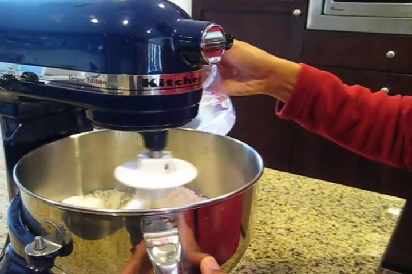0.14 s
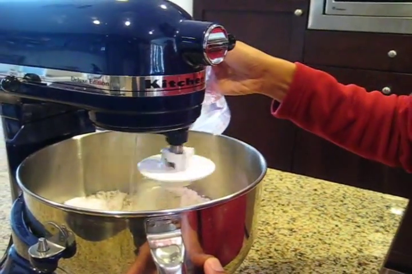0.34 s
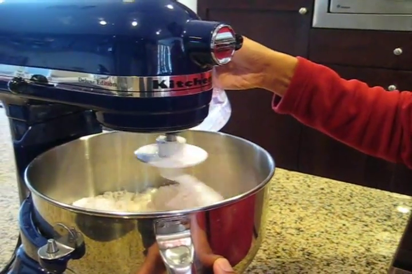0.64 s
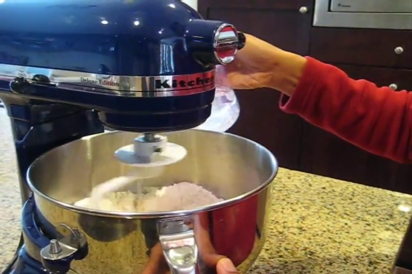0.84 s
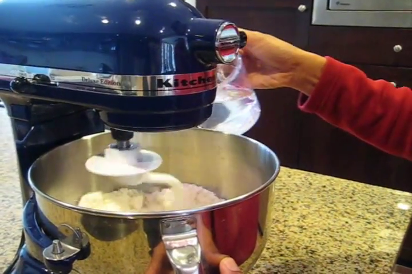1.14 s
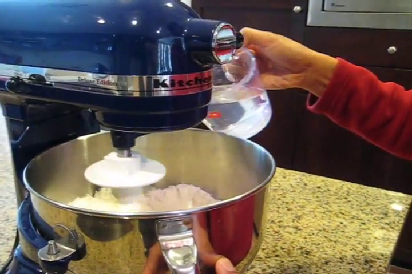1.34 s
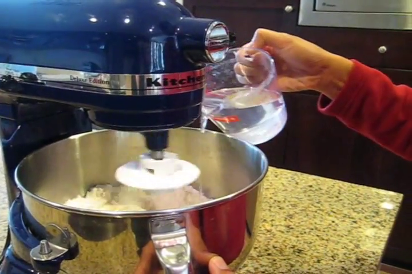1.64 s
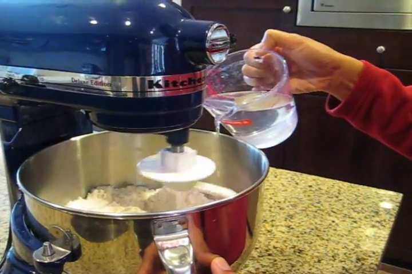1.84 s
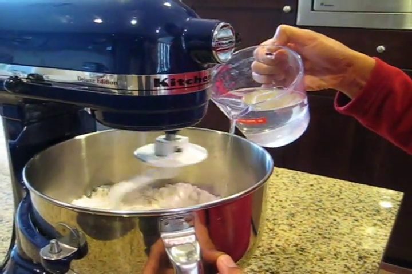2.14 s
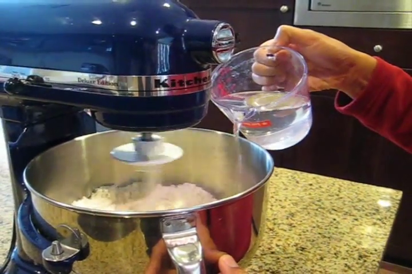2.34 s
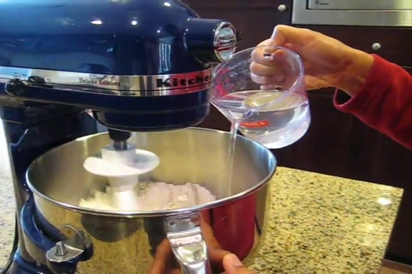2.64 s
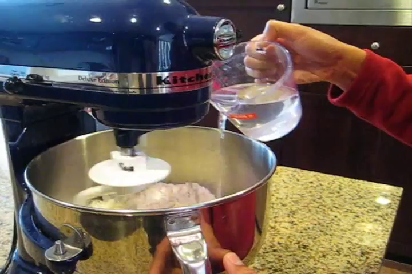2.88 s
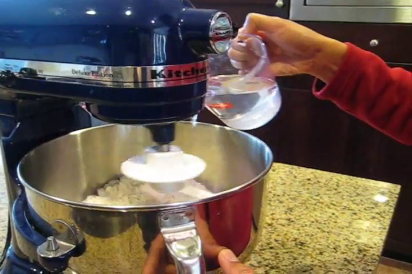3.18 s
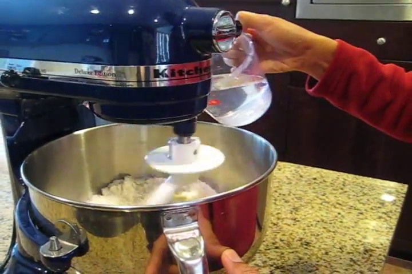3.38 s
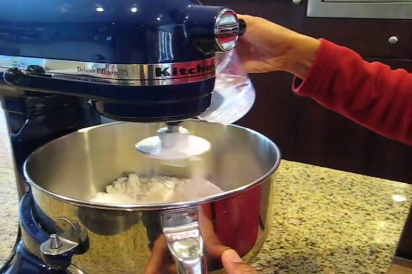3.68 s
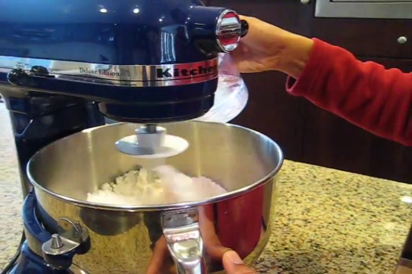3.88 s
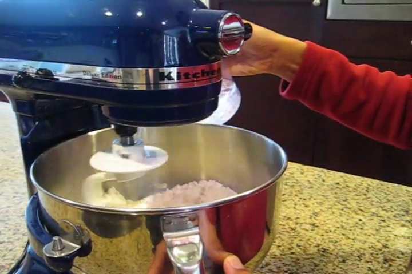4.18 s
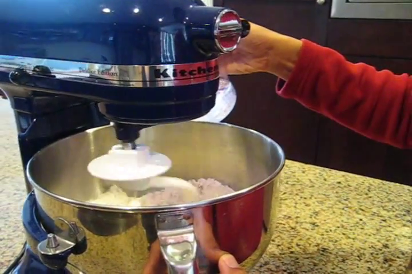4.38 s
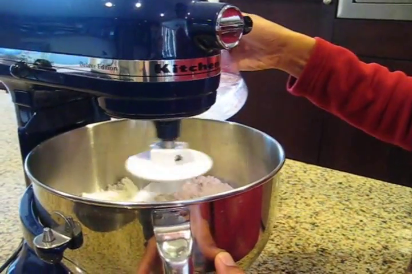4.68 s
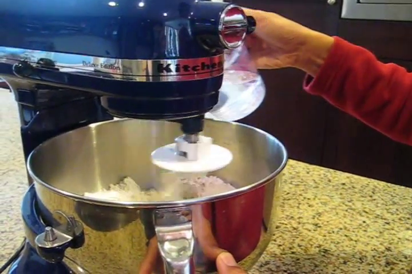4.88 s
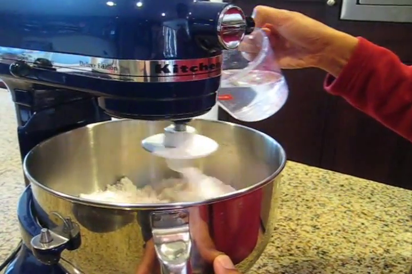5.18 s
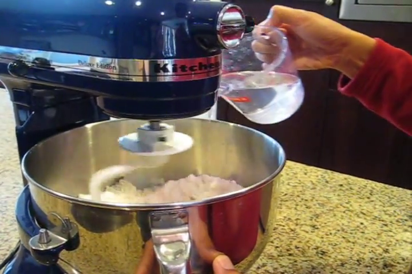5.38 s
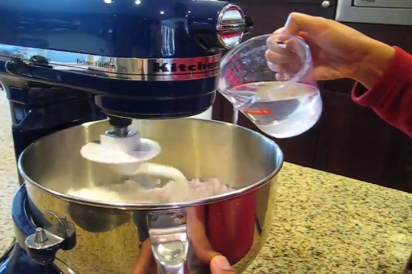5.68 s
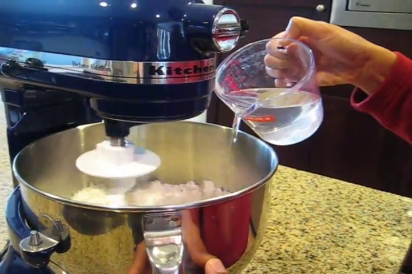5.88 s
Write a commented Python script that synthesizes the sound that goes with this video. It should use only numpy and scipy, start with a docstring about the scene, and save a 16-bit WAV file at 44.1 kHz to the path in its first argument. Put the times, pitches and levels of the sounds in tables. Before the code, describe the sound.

A stand mixer runs at low speed in a kitchen, close to the microphone. Its motor gives a bright, metallic rasp and hiss over a steady hum. Behind that, gears whine and chatter lightly above a faint rush of air. The sound pulses gently and the pitch sags a little as the dough hook turns, carrying on without a break from start to finish.

```python
"""A stand mixer's motor rasps and hums at low speed, close by in a kitchen, as its hook kneads flour.
Its brushes (sliding electrical contacts) scrape the spinning rotor and make the metal housing ring.
Magnets tug the rotor twice a turn, which makes the hum. Behind it, gears whine and chatter as the load
comes and goes, and a fan blows softly. The speed sags a little with each turn of the shaft and hook."""
import sys
import numpy as np
from scipy import signal
from scipy.fft import rfft, irfft, next_fast_len
from scipy.io import wavfile
from scipy.ndimage import map_coordinates

SR = 44100
rng = np.random.default_rng(int(sys.argv[2]) if len(sys.argv) > 2 else 0)


def dump_mix(stems):
    """Bounce the given channels to the path in sys.argv[1] as a 16-bit WAV at rate SR."""
    frames = np.atleast_2d(stems).T  # one column per channel
    limited = np.clip(frames, -1, 1)  # hard clip at full scale
    pcm = np.round(limited * 32767).astype(np.int16)
    wavfile.write(sys.argv[1], SR, pcm)


N = 265482

# Tone colour of the fan's air: f/Hz, relative level/dB
AIR_SPECTRUM = [(15, -31), (30, -31), (55, -20.5), (160, -17), (230, -4.5), (300, -3.5), (360, 5),
                (440, 6.5), (490, 4.5), (545, -6.5), (640, 2), (780, 7), (950, -2.5), (3000, -46)]
# Tone colour of the knocked gearbox: f/Hz, relative level/dB
GEARBOX_SPECTRUM = [(500, -23.5), (950, -12.5), (1100, 7.5), (1180, -1.5), (1270, 6), (1350, 5.5),
                    (1500, 9.5), (1650, -2.5), (1950, -9.5), (3000, -26)]
# Gear tones: cycles per turn of the gear wheel, level/dB, phase jitter/rad
WHINE_TONES = [(8.86, -48, .5), (11, -49, .4), (13, -50, .4), (18.4, -52, .5), (19, -52, .5), (21, -52, .5),
               (28.9, -46, .4), (33, -45.5, .4), (58.8, -40, .5), (71.9, -36.5, .5), (85, -41, .7),
               (107.8, -31.2, .55), (137.2, -34, .9)]
# Slow swell of the high gear tones, which ring the housing: t/s, level change/dB
HIGH_WHINE_SWELL = [(0, 0.5), (1.0, 0), (1.3, 1.5), (3.2, 1.5), (4.2, -0.5), (6.02, -2)]
# Slow loudness curve of the hum's lowest tone: t/s, level/dB
HUM_LEVEL = [(0, -26), (4.3, -25.5), (5.1, -24.5), (6.02, -24.8)]
# Brief swells and dips of the tone an octave above it: t/s, half width/s, level change/dB
HUM_OCTAVE_SWELLS = [(.1, .2, -2.5), (1.13, .13, 4), (1.33, .04, -4), (1.52, .06, -3), (3.31, .07, 3),
                     (3.53, .05, -4.5), (4.38, .06, 3), (5.75, .1, 3), (5.86, .025, -7)]
# Buzz of the motor's coils on mains power: f/Hz, level/dB
COIL_TONES = [(120, -70), (240, -47.5), (360, -44), (480, -58.5)]
# Slow swell of the brush noise: t/s, level change/dB
BRUSH_SWELL = [(0, -.1), (.4, 0), (.67, -0.5), (.92, 1), (1.3, -0.8), (1.53, 0.3), (1.7, -0.6), (2.15, 0),
               (2.6, -0.3), (3.0, -0.65), (4.1, -0.1), (4.6, 0.2), (6.02, -0.36)]
# Tone colour of the brushes' rasp: f/Hz, relative level/dB
RASP_SPECTRUM = [(900, -35), (1600, -7), (1950, -3), (2500, 0), (3100, -2), (3550, -2), (3950, 5),
                 (4400, 2.5), (5100, 4.5), (5800, 2), (6400, -1), (7500, -17), (10000, -40)]
# Tone colour of their higher hiss: f/Hz, relative level/dB
HISS_SPECTRUM = [(4000, -27.5), (6000, 0), (6900, 1.5), (7600, 2), (8000, -1.5), (9500, -2.5),
                 (10500, -1.5), (11000, 0.5), (11550, -0.5), (11900, -10.5), (12600, -7.5), (13600, -13),
                 (14700, -47), (15200, -50)]
# Pitches that the metal housing boosts or weakens: f/Hz, width/Hz, level change/dB
HOUSING_RESONANCES = [(1960, 60, -4), (2290, 120, 4.5), (2440, 90, -4), (2540, 70, 4), (2680, 45, 4),
                      (2870, 30, 6), (3060, 60, 3), (3270, 130, 6), (3820, 110, -4), (4080, 130, 5),
                      (4210, 40, -5), (4300, 70, 5), (4440, 70, 5.5), (4680, 80, 3), (4790, 50, 3),
                      (4860, 50, -4), (5260, 240, 7), (5490, 40, 3), (5585, 35, 4), (5930, 50, 3),
                      (6105, 60, 5), (6220, 110, -3), (6550, 35, 4), (6880, 60, 5), (7030, 90, 4),
                      (7350, 55, 6), (8300, 90, 3), (9330, 100, 4), (10000, 90, 3), (10800, 90, 3)]

HUM_HZ, ROTOR_TURNS_PER_WHEEL_TURN = 382.7, 5
# Repeating swings, each as (rate/Hz, time of one peak/s)
SHAFT, HOOK, THROB = (6.378, .13), (2.205, .235), (5.235, .024)
TIME = np.arange(N) / SR


def amp(db):
    """Turn decibels into a number to multiply by."""
    return 10 ** (np.asarray(db) / 20)


def unit(x):
    """Scale x to an average strength (rms) of 1."""
    return x / np.sqrt(np.mean(x ** 2) + 1e-20)


def curve(rows):
    """Join (time, value) points with straight lines."""
    return np.interp(TIME, *np.transpose(rows))


def wobble(rate):
    """A smooth curve through rate random points a second."""
    points = rng.standard_normal(int(N * rate / SR) + 4)
    return map_coordinates(points, [TIME * rate])


def cycle(rate_hz, peak_s, lead_s=0):
    """A steady swing between -1 and 1, peaking lead_s early."""
    return np.cos(2 * np.pi * rate_hz * (TIME + lead_s - peak_s))


def load(shaft_db, hook_db):
    """Swell in dB as the drive shaft rubs once a turn and the hook pushes into the flour."""
    return shaft_db * cycle(*SHAFT) + hook_db * cycle(*HOOK)


def bumps(turns, count):
    """Random bumps at count places around a shaft, met again on every turn."""
    heights = rng.standard_normal(count)
    position = turns % 1 * count
    return unit(map_coordinates(heights - heights.mean(), [position], mode="grid-wrap", order=1))


def ring(x, spectrum, resonances=()):
    """Give x the tone colour of a ringing object; the result has strength 1."""
    hz = np.fft.rfftfreq(2 * next_fast_len(N // 2 + 1), 1 / SR)
    points_hz, points_db = np.transpose(spectrum)
    db = np.interp(np.log(hz + 1), np.log(points_hz), points_db)
    for centre, width, lift in resonances:
        db = db + lift / (1 + (2 * (hz - centre) / width) ** 2)
    # Build the filter so that ringing follows each push and never comes before it.
    cepstrum = irfft(np.log(amp(db)))
    size = len(cepstrum)
    cepstrum[1:size // 2] *= 2
    cepstrum[size // 2 + 1:] = 0
    response = np.exp(rfft(cepstrum))
    return unit(irfft(rfft(x, size) * response)[:N])


def kitchen_echo(x, echo_db, fade_s):
    """Bowl, counter and cupboards add a short, dense echo that falls 60 dB in fade_s."""
    t = np.arange(SR // 4) / SR
    tail = rng.standard_normal(len(t)) * amp(-60 * t / fade_s) * (t > .002)
    echo = signal.fftconvolve(x, tail / np.linalg.norm(tail))[:N]
    return (x + amp(echo_db) * echo) / np.hypot(1, amp(echo_db))


def cooling_fan(db):
    """The fan pushes air through the motor shell in a low, steady rush."""
    return amp(db) * ring(rng.standard_normal(N), AIR_SPECTRUM)


def gear_chatter(db, knocks_per_s, scatter_db, throb_db):
    """Loose teeth knock at random and ring the gearbox, surging with the load and a steady throb."""
    surge_db = load(shaft_db=1.5, hook_db=.6) + throb_db * cycle(*THROB) + .55 * wobble(5)
    struck = rng.random(N) < knocks_per_s / SR
    strength = amp(scatter_db * rng.standard_normal(N))
    knocks = struck * strength * rng.choice([-1, 1], N)
    return amp(db + surge_db) * ring(knocks, GEARBOX_SPECTRUM)


def gear_whine(wheel_turns, high_above_hz=2000, high_sway=.5):
    """Gear tones follow the wheel's speed, blurred by slack between the teeth; high ones sway less."""
    wheel_hz = HUM_HZ / 2 / ROTOR_TURNS_PER_WHEEL_TURN
    steadier_turns = high_sway * wheel_turns + (1 - high_sway) * wheel_hz * TIME
    high_swell_db = curve(HIGH_WHINE_SWELL)
    tones = np.zeros(N)
    for multiple, db, jitter in WHINE_TONES:
        flutter_db = 1.6 * wobble(40)
        slack = jitter * wobble(45)
        is_high = multiple * wheel_hz > high_above_hz
        turns, swell_db = (steadier_turns, high_swell_db) if is_high else (wheel_turns, 0)
        tones += amp(db + swell_db + flutter_db) * np.sin(2 * np.pi * multiple * turns + slack)
    return np.sqrt(2) * tones


def motor_speed(lead_s=.04):
    """Rotor turns a second: the load slows it just before the sound swells."""
    hook_hz, hook_peak_s = HOOK
    sag_hz = 1.8 * cycle(*SHAFT, lead_s) + .85 * cycle(*HOOK, lead_s)
    sag_hz += .6 * cycle(2 * hook_hz, hook_peak_s, -lead_s)  # a smaller sag, twice per hook turn
    wander_hz = wobble(18)  # the speed control never quite settles
    return (HUM_HZ - sag_hz + wander_hz) / 2  # two hum cycles make one turn


def motor_hum(rotor_turns, octave_base_db):
    """Two magnet poles tug the rotor twice a turn, and the coils buzz with the mains power."""
    hum_db = curve(HUM_LEVEL) + load(shaft_db=.6, hook_db=.25) + .35 * wobble(16)
    swells_db = sum(db * np.exp(-((TIME - s) / width) ** 2) for s, width, db in HUM_OCTAVE_SWELLS)
    octave_db = octave_base_db + swells_db + load(shaft_db=.8, hook_db=1.3) + .9 * wobble(10)
    phase = 2 * np.pi * 2 * rotor_turns
    poles = amp(hum_db) * np.sin(phase) + amp(octave_db) * np.sin(2 * phase)
    coils = np.zeros(N)
    for hz, db in COIL_TONES:
        coils += amp(db + .52 * wobble(17)) * np.sin(2 * np.pi * (hz * TIME + rng.random()))
    return np.sqrt(2) * (poles + coils)


def motor_brushes(rotor_turns, wheel_turns, rasp_db, hiss_db):
    """Brushes scrape the rotor's uneven contact ring, pressing in a pattern that repeats as it spins."""
    pressure_db = unit(bumps(wheel_turns, count=40) + .3 * bumps(rotor_turns, count=8))
    swell_db = curve(BRUSH_SWELL) + .05 * cycle(*THROB)
    contact = amp(swell_db - .07 * wobble(7.1))  # now firmer, now lighter
    scrape = rng.standard_normal(N) + .33 * bumps(wheel_turns, count=600)  # a little of it repeats
    rasp = ring(scrape * contact * amp(pressure_db), RASP_SPECTRUM, HOUSING_RESONANCES)
    rocking_db = 1.2 * np.sin(2 * np.pi * wheel_turns)  # each wheel turn rocks the rotor once
    fine_scrape = rng.standard_normal(N) * contact
    flutter_db = .51 * pressure_db + rocking_db + .59 * wobble(16)
    hiss = ring(fine_scrape * amp(flutter_db), HISS_SPECTRUM, HOUSING_RESONANCES)
    return amp(rasp_db) * rasp + amp(hiss_db) * hiss


def scene():
    """Add up the parts in one channel; brushes, whine and hum share one motor speed."""
    rotor_turns = np.cumsum(motor_speed()) / SR
    wheel_turns = rotor_turns / ROTOR_TURNS_PER_WHEEL_TURN  # a screw on the rotor drives the wheel
    brushes = motor_brushes(rotor_turns, wheel_turns, rasp_db=-20.5, hiss_db=-25)
    whine = gear_whine(wheel_turns)
    chatter = gear_chatter(db=-30.5, knocks_per_s=2400, scatter_db=3.5, throb_db=1.4)
    hum = motor_hum(rotor_turns, octave_base_db=-33.5)
    brushes_in_room = kitchen_echo(brushes, echo_db=-13.5, fade_s=.22)
    return (cooling_fan(db=-37) + chatter + whine + hum + brushes_in_room)[None]


def record(dry, top_hz=15100):
    """The microphone picks up nothing above top_hz."""
    size = next_fast_len(N + SR // 2)
    heard = np.fft.rfftfreq(size, 1 / SR) < top_hz
    return irfft(rfft(dry, size) * heard, size)[..., :N]


dry = scene()
out = record(dry)
dump_mix(out)
```